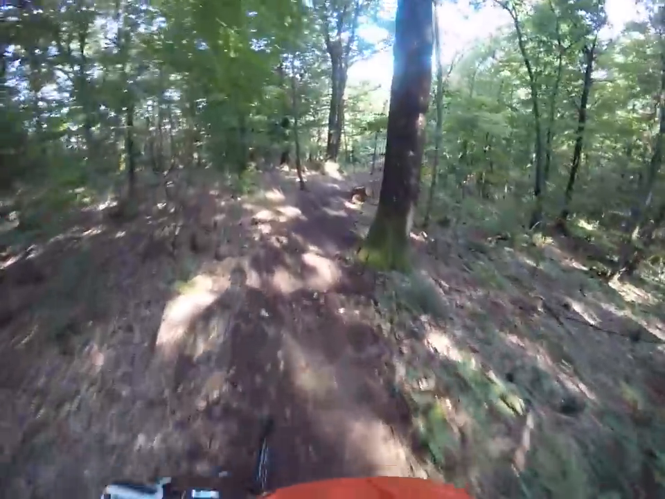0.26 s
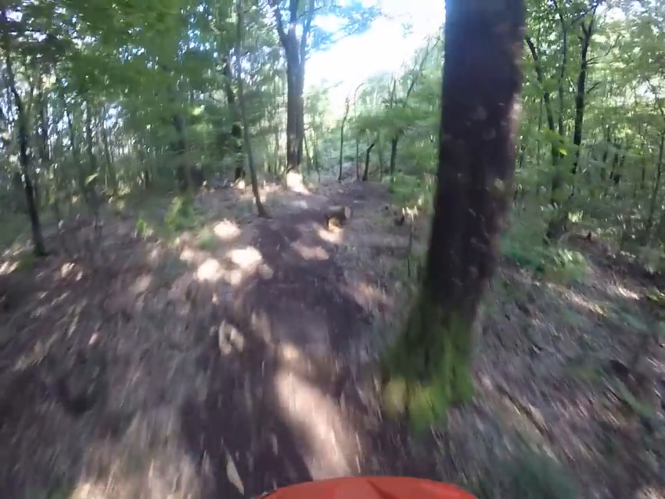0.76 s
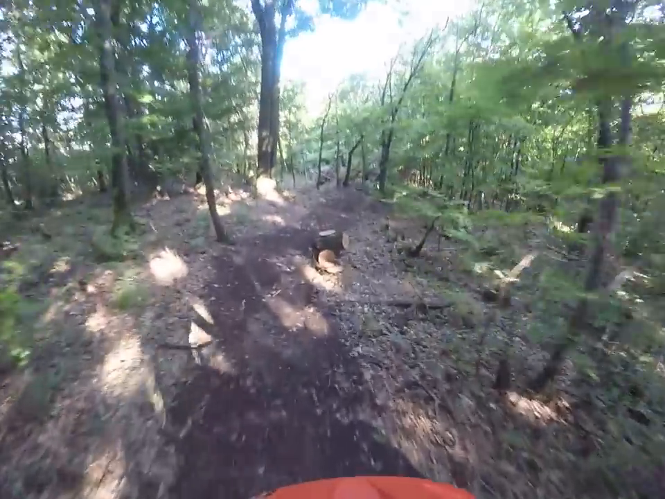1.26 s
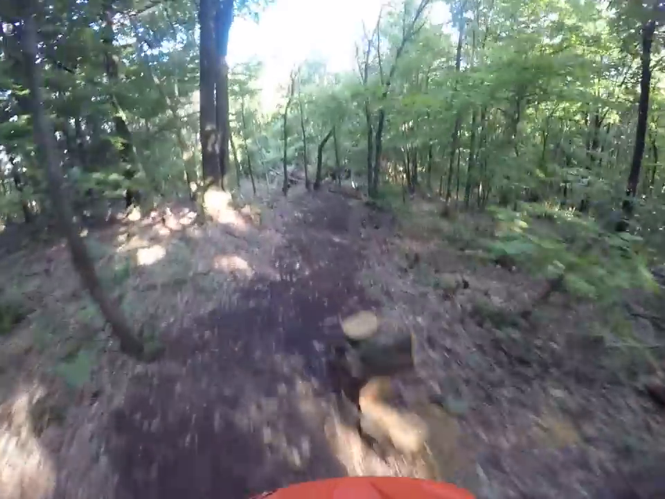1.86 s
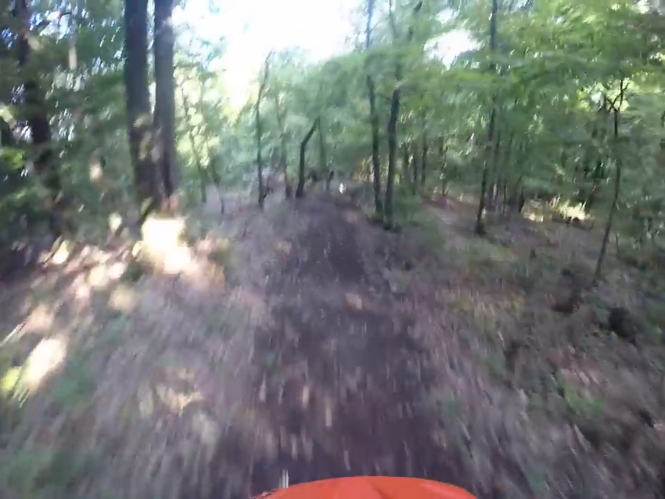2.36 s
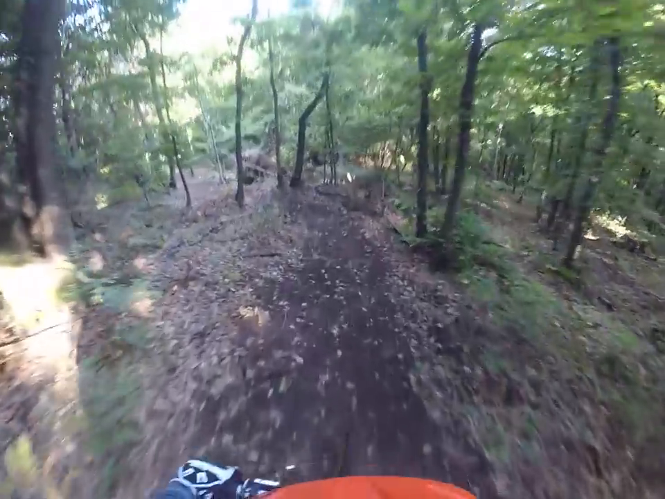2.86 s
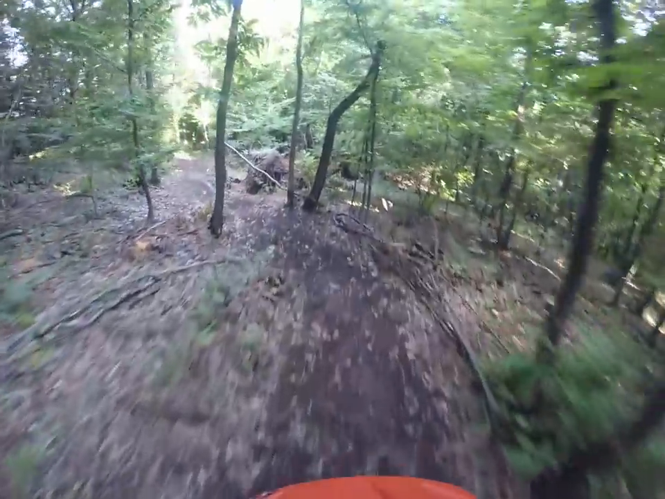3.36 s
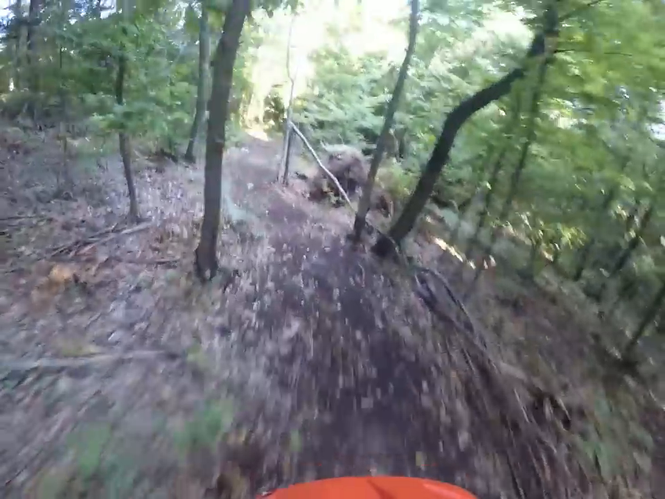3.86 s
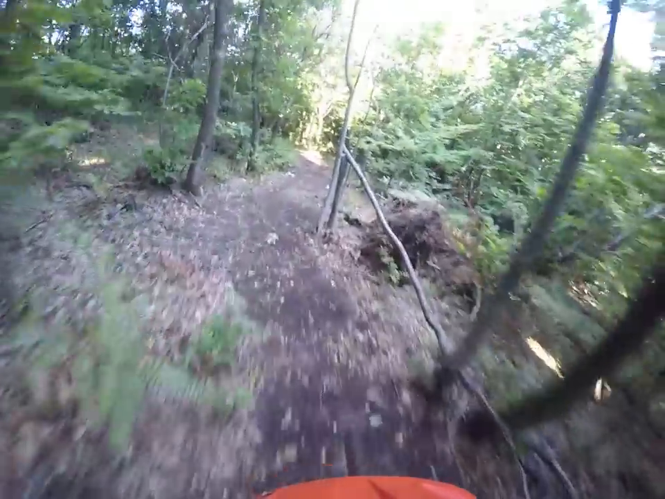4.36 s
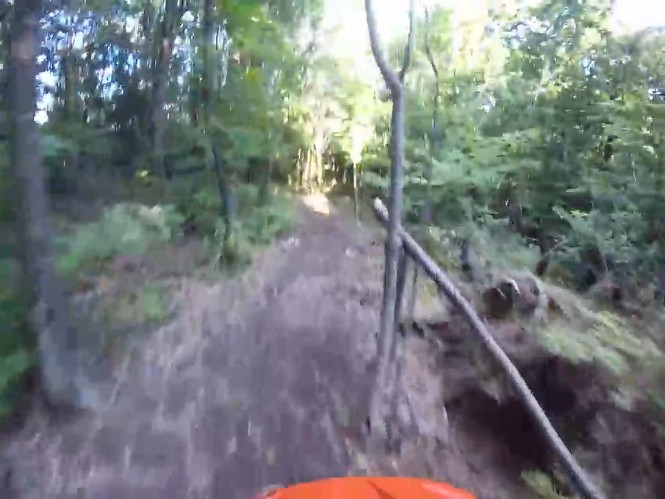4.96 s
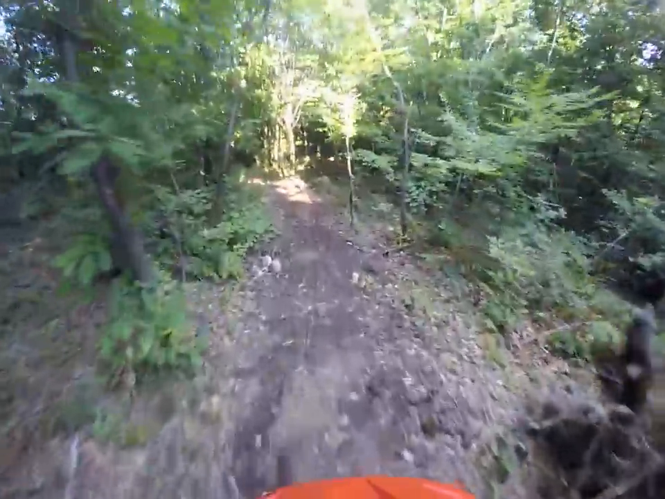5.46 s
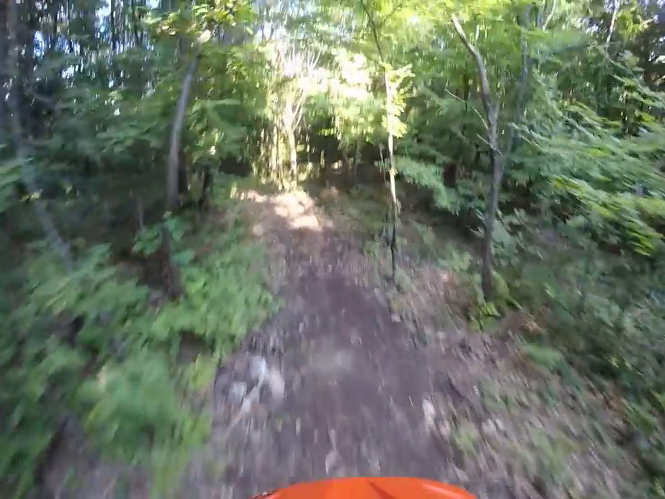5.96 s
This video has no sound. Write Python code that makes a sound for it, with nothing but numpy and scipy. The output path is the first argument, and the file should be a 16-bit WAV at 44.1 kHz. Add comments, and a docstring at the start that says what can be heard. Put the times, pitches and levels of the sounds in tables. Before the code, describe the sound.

A bike bounces down a rough forest trail, its onboard camera case rumbling deeply while hard clacks, knocks and scrapes break over muffled tyre crunch.

```python
"""A dirt bike rolls down a bumpy forest trail, heard from inside the case of a camera that rides along.
From the start the case rocks and drones (shaped noise) over muffled tyre crunch (noise and grit) and twig ticks.
From 0.4 s bumps knock and gear clacks and scrapes on the case (modes excited by taps and slips); the mount
thumps (decaying sines), hardest near 0.85 s. More blows and scrapes come in scattered groups.
Near 4.2 s leaves swish past (swells of bright grains); blows and scrapes go on almost to the end."""
import sys
import numpy as np
from scipy import signal
from scipy.fft import rfft, irfft
from scipy.io import wavfile
from scipy.ndimage import uniform_filter1d

SR = 44100
rng = np.random.default_rng(int(sys.argv[2]) if len(sys.argv) > 2 else 0)


def log_audio(samples):
    """Write samples as a 16-bit WAV file to the path given in sys.argv[1]."""
    # one column per channel
    frames = np.atleast_2d(samples).T
    # limit to full scale, then quantise
    limited = np.clip(frames, -1, 1)
    pcm = np.round(limited * 32767).astype(np.int16)
    wavfile.write(sys.argv[1], SR, pcm)


N = 274008
TIME = np.arange(N) / SR
HZ = np.fft.rfftfreq(N, 1 / SR)


def amp(db):
    """Decibel law: amplitude ratio of a level in dB."""
    return 10 ** (np.asarray(db) / 20)


def unit(x):
    """Normalisation to an rms of 1."""
    return x / np.sqrt(np.mean(x ** 2) + 1e-20)


def level(curve):
    """Envelope: gain over time, interpolated in dB from rows (t/s, level/dB)."""
    return amp(np.interp(TIME, *np.transpose(curve)))


def shape(points, hz):
    """Frequency response: gain interpolated over log frequency from rows (f/Hz, level/dB)."""
    f, db = np.transpose(points)
    return amp(np.interp(np.log(hz + 1), np.log(f + 1), db))


def coloured(x, points):
    """Linear filtering: weights the spectrum of x, then sets its rms to 1."""
    return unit(irfft(rfft(x) * shape(points, HZ), N))


def add(mix, s, sound):
    """Superposition: adds a sound to the mix from time s, cut at the end of the mix."""
    part = mix[max(round(s * SR), 0):][:len(sound)]
    part += sound[:len(part)]


def wander(rate_hz):
    """Slow random modulation: noise under a Gaussian low-pass, at rms 1."""
    return unit(irfft(rfft(rng.standard_normal(N)) * np.exp(-(HZ / rate_hz) ** 2), N))


def grains(per_s, spread_db):
    """Random impulse process: clicks of either sign, most small and a few large, at rms 1."""
    size = amp(spread_db * np.minimum(rng.exponential(1, N), 4))
    sign = rng.choice([-1, 1], N)
    present = rng.random(N) < per_s / SR
    return unit(size * sign * present)


# deep shaking of the ride: t/s, relative level/dB
RUMBLE = [(0.0, -28), (0.2, -32), (1.04, -23), (1.18, -28), (2.5, -23), (2.98, -32), (3.3, -23),
          (3.52, -33), (3.6, -24), (4.34, -22), (4.6, -27), (4.88, -19), (5.34, -34), (5.44, -24),
          (5.54, -39), (5.78, -19), (6.0, -31), (6.18, -26)]
# spectrum of the rocking: f/Hz, relative level/dB
RUMBLE_COLOUR = [(5, -52), (11, 5), (17, 4), (23, 0), (30, -4), (40, -12.5), (55, -21), (80, -33),
                 (160, -65.5), (400, -110)]
# spectrum of the drone: f/Hz, relative level/dB
DRONE_COLOUR = [(30, -31), (60, -8.5), (95, -1.5), (130, -1.5), (150, -8.5), (180, -33), (240, -29.5),
                (500, -58), (1500, -89)]
# roughness of the ground, which drives the drone, the tyres and the twigs: t/s, relative level/dB
GROUND = [(0, -1), (.25, -4), (.45, 2), (1.12, -1), (1.5, 0.5), (1.85, 7), (2.1, 0), (2.37, 2.5),
          (2.62, -.5), (3.35, -2.5), (4.05, 1), (4.3, 0.5), (4.75, -1), (5.3, 1), (5.55, -4.5), (5.77, 2.5),
          (5.9, -3.5), (6.21, 5)]
DRONE_DB, DRONE_FOLLOW = -44.5, 1.2  # before the ground's gain; dB of drone per dB of roughness


def rumble(rumble_db=6.0, lumps_db=2, sway=.25):
    """Forced vibration: the case rocks below 40 Hz; its mount drones higher up, kicked by small stones."""
    rocking = coloured(rng.standard_normal(N), RUMBLE_COLOUR)
    power = abs(signal.hilbert(rocking)) ** 2
    for _ in range(2):
        power = uniform_filter1d(power, SR // 8)
    even_swings = unit(rocking / np.sqrt(power))
    rocking = level(RUMBLE) * even_swings  # the ride sets their size

    stones = grains(per_s=40, spread_db=1.5)
    drone = coloured(rng.standard_normal(N) + stones, DRONE_COLOUR)
    drone *= amp(lumps_db * wander(rate_hz=29))
    drone *= level(GROUND) ** DRONE_FOLLOW
    drone *= unit(abs(signal.hilbert(rocking)) ** sway)  # wide swings flex the mount more

    ease = np.minimum(1, np.minimum(TIME, TIME[::-1]) / .015)  # 15 ms fade at each end
    return ease * (amp(rumble_db) * rocking + amp(DRONE_DB) * drone)


# spectrum of the rolling tyres: f/Hz, relative level/dB
ROLL_COLOUR = [(100, 15.5), (200, 6.5), (330, 2), (450, 0), (700, -1), (1200, 1.5), (2000, 0), (2700, -0.5),
               (3100, -6.5), (4000, -5.5), (4900, -16), (5700, -16), (8000, -25), (15000, -52)]
ROLL_DB = -51.5  # before the gains of the ground and its lumps


def tyres(grit_db=-4, lumps_db=2.4, patches_db=2.86):
    """Rolling noise: a muffled wash of soil with snapping grit swells over patches of rougher ground."""
    grit = grains(per_s=260, spread_db=3.5)
    crunch = unit(rng.standard_normal(N) + amp(grit_db) * grit)
    uneven_db = lumps_db * wander(rate_hz=50) + patches_db * wander(rate_hz=4.2)
    return amp(ROLL_DB + uneven_db) * level(GROUND) * coloured(crunch, ROLL_COLOUR)


CONTACT_DB, CONTACT_OCTAVES = 3.5, 0.13  # height and width of the range that a contact favours


def response(modes, bass_db, bright_db, contact_hz):
    """Modal superposition: each damped mode swells and dies; neighbours swing in opposite senses."""
    t = np.arange(SR // 20) / SR
    out = np.zeros(len(t))
    for k, (hz, width, db) in enumerate(modes):
        colour_db = bass_db * np.clip(np.log2(1000 / hz), 0, 1)
        colour_db += bright_db * np.clip(np.log2(hz / 1600), 0, 2)
        colour_db += CONTACT_DB * np.exp(-(np.log2(hz / contact_hz) / CONTACT_OCTAVES) ** 2)
        age = 2 * np.pi * width * t
        swell = width * age * np.exp(-age)
        out += (-1) ** k * amp(db + colour_db) * swell * np.sin(2 * np.pi * hz * t)
    return out / np.sqrt(np.mean(out[:round(.009 * SR)] ** 2))  # rms 1 over the first 9 ms


# resonances of the face of the case: f/Hz, half width/Hz, relative level/dB
FACE = [(306, 79, -22.5), (546, 69, -23.5), (1132, 85, -4.5), (1633, 470, -9.5), (2052, 222, 5.5),
        (2361, 100, 2.5), (2713, 187, 2), (3640, 110, -11.5), (4460, 970, -22.5), (7130, 2000, -41),
        (10500, 3000, -66)]
# resonances of the body of the case: f/Hz, half width/Hz, relative level/dB
BODY = [(320, 47.5, -11), (576, 77, -11.5), (821.4, 66, -4), (1015, 40, -12.5), (1271, 112, -1),
        (1621, 125, -2), (2005, 50, -9), (2625, 250, -6.5), (3380, 120, -17), (3990, 120, -19.5),
        (4466, 190, -27), (5370, 1600, -46), (9000, 2600, -58)]


def blow(face, colour, tail_db, tail_t60):
    """Impact excitation: each blow sounds face and body, with a short fading tail of noise."""
    t = np.arange(SR // 3) / SR
    face = np.clip(face, 0, 1)
    tap = face * response(FACE, *colour) + (1 - face) * response(BODY, *colour)
    tap /= np.hypot(face, 1 - face)
    noise = unit(signal.fftconvolve(rng.standard_normal(len(t)), tap)[:len(t)])
    out = noise * amp(tail_db - 60 * t / tail_t60)
    add(out, 0, tap)
    return out


# bumps of the trail knock the case through its mount:
# t/s, tap level/dB over the first 9 ms, share on the face (0-1), brightness/(dB per octave)
BUMPS = [(0.4038, -42, 0.68, 7.5), (0.8414, -28, 0.83, -2), (0.8489, -35, 0, 3), (.8798, -23, 0.63, 8),
         (0.8891, -26.5, 0.05, 1), (1.3656, -46.5, 0.6, -10), (1.551, -35, 0.07, 3.5),
         (2.245, -37.5, 0.86, 3), (3.53, -43, 0, -1), (3.714, -34, 0.93, 2.5), (4.2638, -26.5, 0.65, -0.5),
         (4.7096, -21, 0.2, 5), (5.0658, -31, 0.2, -1.5), (5.3782, -42.5, 0.06, 5), (5.5689, -40, 1, 12.5)]
BUMP_BASS_DB, BUMP_TAIL_DB, BUMP_CONTACT_HZ = 18.5, -7, 2200  # lift of the bass; noise tail against the tap


def bumps():
    """Structure-borne impact: a jolt through the mount knocks hollowly, with more bass and a louder tail."""
    out = np.zeros(N)
    for s, db, face, bright_db in BUMPS:
        colour = BUMP_BASS_DB, bright_db, BUMP_CONTACT_HZ
        knock = blow(face, colour, BUMP_TAIL_DB, tail_t60=0.082)
        add(out, s, amp(db) * knock)
    return out


# hard gear strikes the case directly: t/s, tap level/dB over the first 9 ms, share on the face (0-1),
# brightness/(dB per octave), f/Hz favoured by the contact, ring level/dB relative to the tap
STRIKES = [(0.4893, -4.5, 0.96, -3.5, 2270, -19.5), (.8665, -25.5, 0.76, -6, 1510, -45),
           (0.9376, -15, .9, -5.5, 1690, -18.5), (1.0353, -47, 0.16, -3, 1200, -41),
           (1.2262, -7.5, 1, -6.5, 1150, -20), (1.435, -43.5, 0.2, 1, 1460, -39),
           (2.7119, -18, 0, 8.5, 810, -26), (2.7141, -14, 0.25, 5.5, 830, -52.5),
           (3.0782, -48, 0.3, 8.5, 1800, -45), (3.1116, -10, 0, 0, 1610, -23),
           (3.1853, -28.5, 0.07, -7.5, 1480, -16), (3.8013, -13.5, 0.29, -3, 1560, -21),
           (3.8945, -46.5, 0.1, 1, 1520, -52)]
# a small metal part that rings on: f/Hz, relative level/dB, t60/s
RING = [(1160, -17.5, 0.055), (1840, 4.5, 0.2), (2638, -25.5, 0.058)]
STRIKE_BASS_DB, STRIKE_TAIL_DB = -1.5, -17.5  # lift of the bass; noise tail against the tap


def strikes():
    """Direct impact: sharp clacks of the case, some leaving the free vibration of a thin metal ring."""
    out, t = np.zeros(N), np.arange(SR // 3) / SR
    ring = np.zeros(len(t))
    for f, db, t60 in RING:
        ring += amp(db - 60 * t / t60) * np.sin(2 * np.pi * f * t)
    for s, db, face, bright_db, contact_hz, ring_db in STRIKES:
        colour = STRIKE_BASS_DB, bright_db, contact_hz
        clack = blow(face, colour, STRIKE_TAIL_DB, tail_t60=0.1)
        add(out, s, amp(db) * (clack + amp(ring_db) * ring))
    return out


# soft blows through the mount: t/s, peak level/dB, f/Hz
THUMPS = [(0.609, -19.5, 81), (.847, -2, 45.7), (0.868, -16, 108), (0.88, -11, 121), (0.89, -12.5, 98),
          (0.919, -12, 106), (1.551, -31, 110), (1.701, -22, 125), (1.845, -20, 71), (2.308, -24.5, 110),
          (2.715, -25, 87), (3.115, -21.5, 120), (3.528, -31.5, 122), (4.27, -9.5, 110.6), (4.6, -19.5, 90),
          (4.714, -7.5, 111), (5.067, -26.5, 119), (5.377, -31, 131), (5.788, -25, 102)]
THUMP_T60 = 0.055  # s


def thumps(rise_s=0.01):
    """Damped free oscillation: the mount swings for a few cycles after a jolt."""
    out, t = np.zeros(N), np.arange(SR // 3) / SR
    for s, db, hz in THUMPS:
        envelope = amp(-60 * t / THUMP_T60) * (1 - np.exp(-t / rise_s))
        swing = np.sin(2 * np.pi * hz * t) * envelope
        add(out, s, amp(db) * swing / abs(swing).max())
    return out


# scrapes over the case: t/s, length/s, level/dB, power share on the face (0-1), brightness/(dB per octave)
SCRAPES = [(0.494, 0.047, -34, 0.84, 4), (0.557, 0.038, -35.5, 0.9, -9), (0.604, 0.032, -42, 0.3, -1),
           (0.637, 0.096, -35, 0.75, -4), (0.741, 0.1, -47, .57, 2), (0.826, 0.062, -37, 0.5, 8.5),
           (0.958, 0.021, -36.5, 0.6, 0), (1.565, 0.05, -47, .3, -4), (1.615, 0.034, -31, .02, -7.5),
           (1.667, .058, -29.5, 0.06, -6), (1.741, 0.024, -29.5, .1, 0), (1.779, 0.019, -22, 0.28, -9.5),
           (1.812, 0.078, -39, 0.63, 1.5), (1.921, 0.041, -42.5, 0.6, -5), (2.71, 0.056, -38.5, 0.1, 5.5),
           (2.765, 0.061, -48.5, 0, 2.5), (2.832, 0.05, -40, 0.01, 1), (2.96, 0.023, -51, 0.2, 15),
           (4.822, 0.076, -56, 0.1, -6), (5.084, 0.028, -44, .5, -12), (5.63, 0.029, -52.5, .3, 1),
           (5.731, 0.013, -43.5, 0, 2.5), (5.917, 0.016, -57.5, 1, 25)]
SCRAPE_BITE_S, SCRAPE_RELEASE_S = 0.0061, 0.0055  # each stroke bites, holds and lets go
SCRAPE_CONTACT_HZ = 3806


def scrapes(judder_db=2.0, bass_db=-16):
    """Stick-slip friction: quick slips excite the case's modes as the pressure judders along each stroke."""
    out, t = np.zeros(N), np.arange(SR // 5) / SR
    slips = [grains(per_s=1500, spread_db=2.5) * amp(judder_db * wander(rate_hz=130)) for _ in range(2)]
    for s, length, db, on_face, bright_db in SCRAPES:
        bite = np.minimum(1, t / SCRAPE_BITE_S)
        release = np.exp(-np.maximum(t - length, 0) / SCRAPE_RELEASE_S)
        pressure = bite * release
        on_face = np.clip(on_face, 0, 1)
        for modes, share, drive in zip((FACE, BODY), (on_face, 1 - on_face), slips):
            tap = response(modes, bass_db, bright_db, SCRAPE_CONTACT_HZ)
            stroke = signal.fftconvolve(pressure * drive[round(s * SR):][:len(t)], tap)
            stroke *= np.linalg.norm(pressure) / np.linalg.norm(stroke)  # same energy as the pressure
            add(out, s, amp(db) * np.sqrt(share) * stroke)
    return out


# branches sweep past: t/s of the peak, peak level/dB, rise/(s per 20 dB), dying away/(dB per s)
BRANCHES = [(4.17, -47, 0.014, 59), (4.25, -48, 0.041, 200), (4.378, -45, 0.075, 58)]
# spectrum of the leaves: f/Hz, relative level/dB
LEAF_COLOUR = [(300, -31.5), (1200, 0), (2200, 4), (3100, 0), (4000, 4.5), (5000, -6), (5700, -4.5),
               (6500, -9), (9000, -12.5), (11000, -17.5), (15000, -19)]


def leaves():
    """Incoherent power sum: fine bright grains swell and die away as each branch sweeps by."""
    power = np.zeros(N)
    for s, db, rise_s, fall in BRANCHES:
        below_peak_db = np.maximum(20 * (s - TIME) / rise_s, fall * (TIME - s))
        power += amp(db - below_peak_db) ** 2
    return np.sqrt(power) * coloured(grains(per_s=6100, spread_db=2.5), LEAF_COLOUR)


# twigs and dry leaves snapping under the wheels: f/Hz, relative level/dB
TWIG_COLOUR = [(300, -33.5), (1500, 14), (4000, -1), (6000, -16.5), (9000, -11.5), (15000, -20)]


def twigs(twig_db=-67, clumps_db=3):
    """Modulated impulse noise: sparse bright ticks in clumps, louder on rough ground."""
    ticks = grains(per_s=300, spread_db=3.5) * amp(clumps_db * wander(rate_hz=25))
    return amp(twig_db) * level(GROUND) * coloured(ticks, TWIG_COLOUR)


def scene():
    """Superposition: the steady ride, with blows, scrapes and foliage on top."""
    ride = rumble() + tyres() + twigs()
    blows = bumps() + strikes() + thumps()
    return (ride + blows + scrapes() + leaves())[None]


HISS_DB, CUTOFF_HZ = -69, 15400


def record(dry, ceiling=0.95):
    """Noise floor, hard clipping and band limiting: faint hiss, overload at the ceiling, then a low-pass."""
    hiss = amp(HISS_DB) * rng.standard_normal(dry.shape)
    clipped = np.clip(dry + hiss, -ceiling, ceiling)
    lowpass = signal.firwin(401, CUTOFF_HZ, window=("kaiser", 9), fs=SR)
    return signal.oaconvolve(clipped, lowpass[None], "same")


dry = scene()
out = record(dry)
log_audio(out)
```